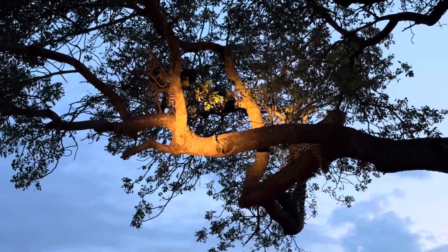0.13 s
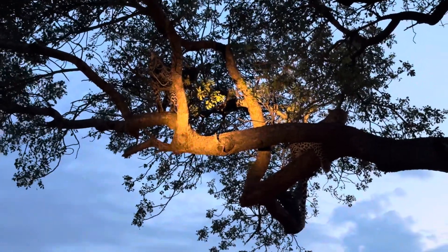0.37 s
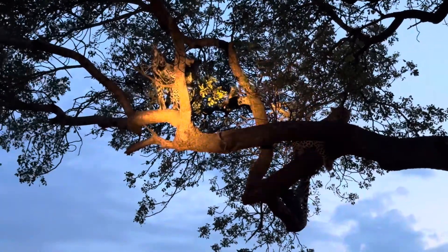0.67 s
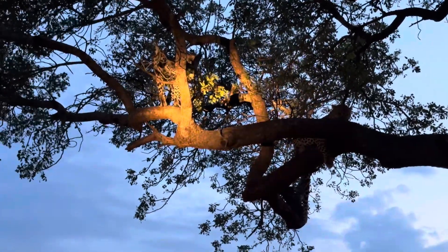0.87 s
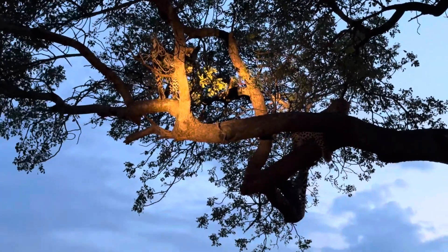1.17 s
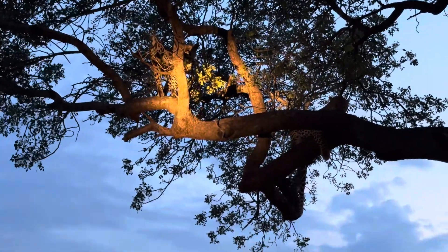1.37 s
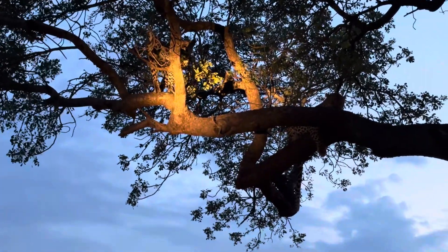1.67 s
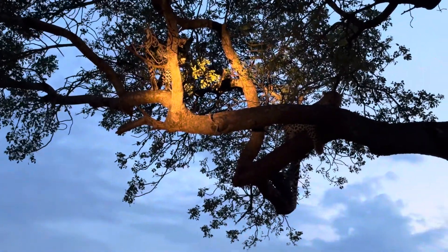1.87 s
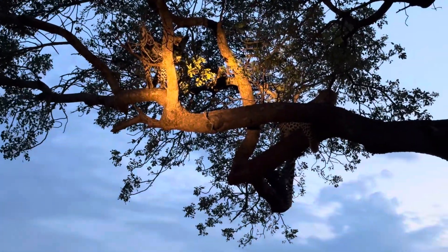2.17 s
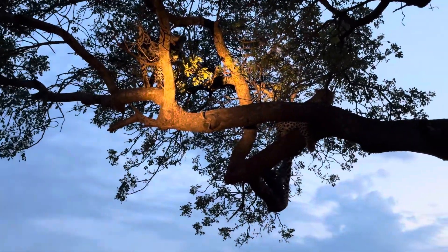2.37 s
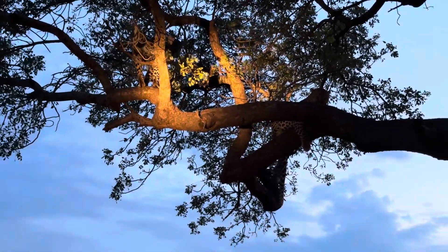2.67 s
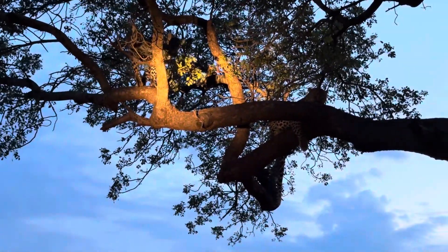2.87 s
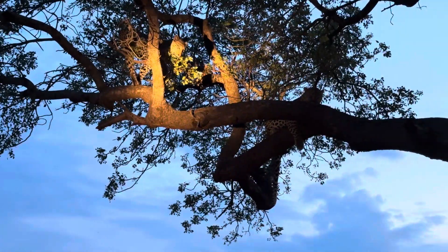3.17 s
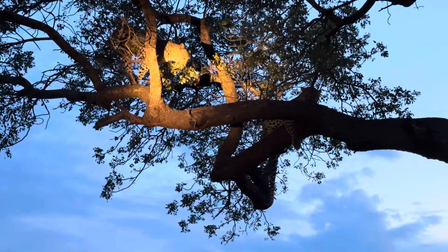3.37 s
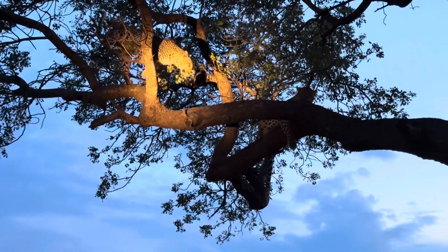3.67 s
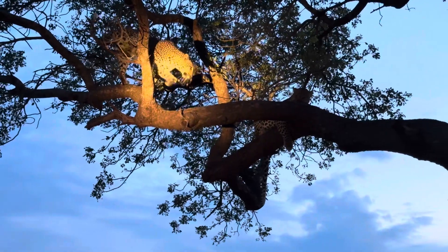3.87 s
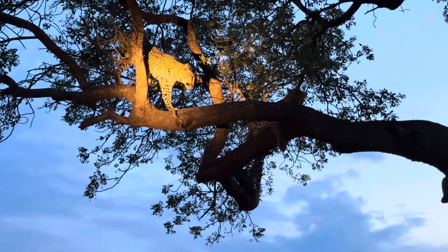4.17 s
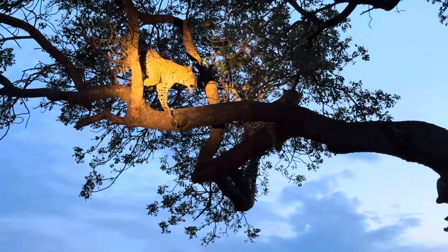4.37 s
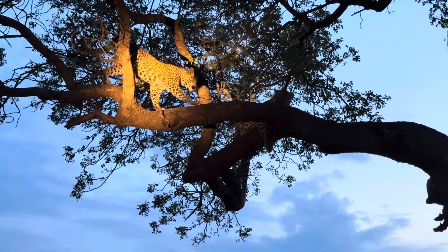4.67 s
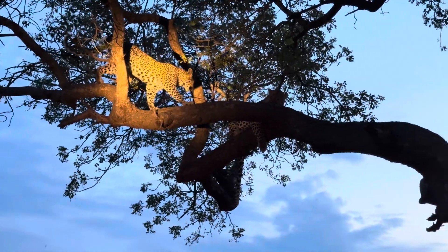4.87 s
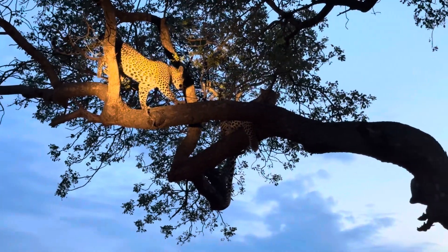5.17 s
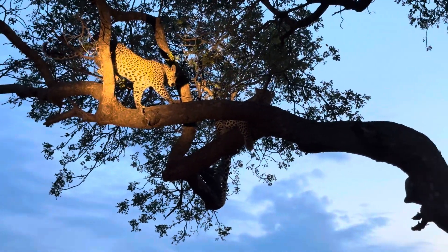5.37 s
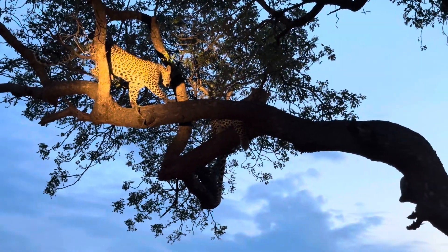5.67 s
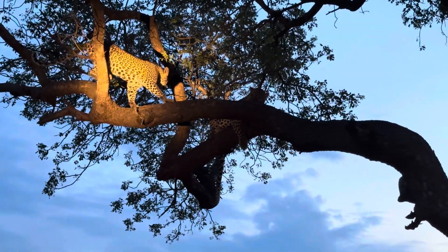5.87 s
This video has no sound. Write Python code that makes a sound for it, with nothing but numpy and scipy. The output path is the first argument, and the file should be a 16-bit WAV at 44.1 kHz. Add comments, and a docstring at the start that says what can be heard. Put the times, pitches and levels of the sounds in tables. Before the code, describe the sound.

Faint insects, soft air and a low rumble continue throughout, outdoors beneath a tree. In the first second a leopard gives two soft, dull, closed-mouth growls. Soft bumps knock the microphone, strongest around 1 second, with a few more up to 3 seconds. Short high trills and very faint distant bird calls come and go until about 5 seconds. Dull rustles follow the first growls. From about 3 seconds leaves crackle lightly and twigs snap as the cat climbs down, with sharper cracks at 3.2 and 4.5 seconds. From 3.6 seconds a low rattling growl swells, is fullest between 4.4 and 4.8 seconds, and fades by 5.2. At 5.4 seconds a louder cough opens a quick run of about six hollow grunts. At 5.9 seconds a short rasping snarl ends it.

```python
"""Leopards in a tree at dusk, heard from below. Insects, faint air and low rumble run throughout.
First: soft closed-mouth growls, far birds, high trills and soft bumps at the microphone.
Twigs snap and leaves crackle as one cat climbs down.
From 3.55 s a rattling growl swells, each beat ringing throat and chest.
At 5.36 s a cough opens a run of hollow grunts; at 5.9 s a rasping snarl ends it."""
import sys
import numpy as np
from scipy import signal
from scipy.fft import rfft, irfft, next_fast_len
from scipy.io import wavfile

SR = 44100
rng = np.random.default_rng(int(sys.argv[2]) if len(sys.argv) > 2 else 0)


def wav_record(signal):
    """Record a signal, one row per channel, as 16-bit PCM in the file named by sys.argv[1]."""
    frames = np.transpose(np.atleast_2d(signal))
    bounded = np.clip(frames, -1, 1)
    # unit amplitude maps onto the largest positive 16-bit level
    quanta = np.round(bounded * 32767).astype(np.int16)
    wavfile.write(sys.argv[1], SR, quanta)


N = 265482
TIME_S = np.arange(N) / SR
RING_N = SR // 4
RING_S = np.arange(RING_N) / SR


def amp(db):
    """Decibels to gain."""
    return 10 ** (np.asarray(db) / 20)


def unit(x):
    """Scale to rms 1."""
    return x / np.sqrt(np.mean(x ** 2) + 1e-30)


def peaked(x):
    """Scale to peak 1."""
    return x / (abs(x).max() + 1e-30)


def at_time(curve, s):
    """Interpolate (time [s], value) rows."""
    return np.interp(s, *np.transpose(curve))


def at_hz(curve, hz):
    """Interpolate (frequency [Hz], value) rows on a log axis."""
    knots_hz, value = np.transpose(curve)
    return np.interp(np.log(hz + 1), np.log(knots_hz + 1), value)


def add(mix, s, sound):
    """Mix a sound in at time s."""
    part = mix[max(round(s * SR), 0):][:len(sound)]
    part += sound[:len(part)]


def noise(gain, size=N):
    """Noise of rms 1 shaped by gain(Hz)."""
    padded = next_fast_len(size, True)
    spectrum = rfft(rng.standard_normal(padded)) * gain(np.fft.rfftfreq(padded, 1 / SR))
    return unit(irfft(spectrum, padded)[:size])


def hiss(spectrum, size=N):
    """Noise of rms 1 shaped by (frequency [Hz], level [dB]) rows."""
    return noise(lambda f: amp(at_hz(spectrum, f)), size)


def band(hz, width_hz, size=N):
    """Gaussian noise band; at 0 Hz, a random drift."""
    return noise(lambda f: np.exp(-((f - hz) / width_hz) ** 2 / 2), size)


def swells(rows, attack_s, release_s):
    """Gain from (start [s], hold [s], level [dB]) rows; attack and release per 20 dB."""
    each_db = [db - 20 * (np.maximum(s - TIME_S, 0) / attack_s
                          + np.maximum(TIME_S - s - hold_s, 0) / release_s) for s, hold_s, db in rows]
    return amp(np.max(each_db, axis=0))


def ring(modes, rise_s, rough, detune, soft=1):
    """One beat rings noisy, detuned modes (frequency [Hz], level [dB], t60 [s]); peak 1."""
    out = np.zeros(RING_N)
    for hz, db, t60_s in modes:
        tone = np.sin(2 * np.pi * hz * (1 + detune * rng.uniform(-1.48, 1)) * RING_S)
        out += amp(db - 60 * RING_S / t60_s) * (tone + rough * band(hz, hz / 7, RING_N))
    return peaked(out * (1 - np.exp(-RING_S / rise_s)) ** soft)


def air(air_db=-75, lump_db=2.5):
    """Faint evening air and lumpy rumble, partly different at the two microphone ports."""
    # spectra: (frequency [Hz], relative level [dB])
    air_spectrum = [(20, -22.5), (150, -0.5), (700, -15.5), (2200, -25), (3400, -23), (6000, -28),
                    (9500, -19.5), (12000, -36), (16000, -31)]
    rumble_spectrum = [(15, -26), (59, -2.5), (93, -11), (124, -28), (300, -39), (390, -34.5), (660, -120)]
    # rumble envelope: (time [s], level [dB])
    rumble_db = [(0, -62), (.45, -52), (1.3, -58), (2.3, -61.5), (3.6, -55), (4.55, -52), (5.25, -60.5),
                 (5.9, -72)]
    sides = np.array([[1], [-1]])
    gain = amp(at_time(rumble_db, TIME_S)) * unit(amp(lump_db * band(0, 8)))
    rumble = gain * (hiss(rumble_spectrum) + 0.92 * sides * hiss(rumble_spectrum))
    low_air = 0.39 * sides * band(0, 710)
    return rumble + amp(air_db) * (hiss(air_spectrum) + low_air)


def insects(flutter_db=3.5):
    """Many distant insects merge into fluttering bands."""
    # chorus bands: (centre [Hz], width [Hz], level [dB])
    bands = [(4216, 360, -81), (7580, 180, -82.5), (7940, 84, -76.5), (9660, 58, -88.5),
             (10230, 290, -90.5)]
    return sum(amp(db) * unit(band(hz, width_hz) * amp(flutter_db * band(0, 6.3)))
               for hz, width_hz, db in bands)


def low_growl(chest_hz=140, beats_per_s=19):
    """Mouth shut: only a dull throb of uneven chest beats comes out."""
    # soft growls: (start [s], hold [s], level [dB])
    growls = [(0, 0.16, -59), (.3, 0.73, -62.5)]
    beats = np.cumsum(beats_per_s * (1 + 0.23 * band(0, 5.7))) / SR
    throb = unit(band(chest_hz, 30) * amp(3.3 * np.cos(2 * np.pi * beats)))
    return swells(growls, attack_s=0.17, release_s=0.38) * throb


def far_birds(notes_per_s=15, arch_hz=260, waver_hz=120):
    """Soft wavering whistles arch up and down in pitch."""
    # phrases: (start [s], length [s], level [dB], top pitch [Hz])
    phrases = [(0, 0.042, -78, 2780), (0.192, 0.23, -80.5, 2970), (1.676, 0.055, -81, 2560),
               (3.74, 0.13, -74, 1823)]
    out = np.zeros(N)
    for s, length_s, db, hz in phrases:
        t = np.arange(0, length_s, 1 / SR)
        arch = np.sin(np.pi * t / length_s)
        pitch_hz = hz + arch_hz * (arch - 1) + waver_hz * band(0, 37, len(t))
        notes = np.sin(np.pi * t * notes_per_s) ** 2
        add(out, s, amp(db) * arch ** .5 * notes * np.sin(2 * np.pi * np.cumsum(pitch_hz) / SR))
    return out


def trills(notes_per_s=56.5, climb_hz=480):
    """Runs of tiny falling whistles; each run climbs in level and pitch, holds, stops."""
    # runs: (start [s], length [s], level [dB], nominal pitch [Hz])
    runs = [(0.028, 0.25, -55.5, 5174), (0.392, 0.22, -59.5, 4950), (1.875, 0.23, -60, 4984),
            (2.124, 0.23, -54, 5160), (2.807, 0.19, -64, 5000), (2.969, 0.16, -64.5, 5140),
            (3.952, 0.23, -59, 4980), (5.004, 0.19, -63, 5000)]
    out = np.zeros(N)
    for s, length_s, db, hz in runs:
        t = np.arange(0, length_s, 1 / SR)
        note_phase = np.cumsum(notes_per_s * (1 + .09 * band(0, 20, len(t)))) / SR % 1
        climb = np.minimum(2 * t / length_s, 1)
        pitch_hz = hz + 200 - climb_hz * (1 - climb) ** 2 - 800 * note_phase * (1 + note_phase)
        notes = np.exp(-((note_phase - .25) / 0.21) ** 2 / 2) * np.sin(np.pi * note_phase) ** .5
        swell = np.sin(np.pi * t / length_s) ** 0.25 * climb ** 0.69
        add(out, s, amp(db) * swell * notes * np.sin(2 * np.pi * np.cumsum(pitch_hz) / SR))
    return out


def bumps(port_lead_rad=0.47):
    """Soft knocks and plops at the microphone sink in pitch; one port leads the other."""
    # (peak time [s], level [dB], pitch [Hz], half length [s], fall [octaves per half length])
    knocks = [(0.061, -50.5, 500, 0.0018, 0.18), (0.531, -41, 56.5, 0.013, 0.09),
              (0.724, -37.5, 77, 0.013, 0.053), (0.769, -38.5, 294, 0.0028, 0.72),
              (0.784, -37, 542, 0.0018, 0.56), (0.966, -28.5, 77.5, 0.0117, 0.27),
              (1.008, -34.5, 64, 0.013, 0.14), (1.872, -34.5, 73.4, 0.01224, 0.85),
              (2.416, -42.5, 67.3, 0.013, 0.07), (2.996, -40.5, 72.5, 0.01, 0.16),
              (3.61, -58.5, 467, 0.003, 0.18)]
    out = np.zeros((2, N))
    for s, db, hz, half_s, fall in knocks:
        halves = np.arange(-2 * half_s, 4 * half_s, 1 / SR) / half_s
        cycles = np.cumsum(hz * 2 ** (-fall * np.clip(halves, -2, 2))) / SR + rng.random()
        swell = np.exp(-halves ** 2 / np.where(halves < 0, 1, 2))
        swell *= signal.windows.tukey(len(halves), .15)
        for port, lead_rad in zip(out, (port_lead_rad, 0)):
            add(port, s - 2 * half_s, amp(db) * swell * np.sin(2 * np.pi * cycles + lead_rad))
    return out


def snaps():
    """A twig breaks: crack, bright splinter, crumbling tail; the branch knocks."""
    # (time [s], relative crack level [dB], splinter over wood [dB], knock level [dB])
    breaks = [(0.786, -78, 21, -66), (1.673, -57, -27, -63.5), (3.219, -43.5, 1.5, -67),
              (3.224, -44.5, 1.5, -57), (3.294, -66.5, 16.5, -81), (3.962, -62.5, 10, -86),
              (4.495, -40, -25, -52.5), (4.542, -60.5, 14, -54), (4.557, -42, 4, -39)]
    # crack spectra: (frequency [Hz], relative level [dB])
    wood = [(150, -16), (350, 7.5), (800, -6), (3000, -8.5), (5000, -36), (16000, -45)]
    splinter = [(1000, -31), (3500, 2.5), (7000, 9), (16000, -3)]
    # branch modes: (frequency [Hz], relative level [dB], t60 [s])
    branch = [(1028, 4.4, 0.036), (1236, 12.6, 0.022), (1457, 7.3, 0.041)]
    out = np.zeros(N)
    for s, db, bright_db, knock_db in breaks:
        crack = hiss(wood, RING_N) + amp(bright_db) * hiss(splinter, RING_N)
        crumble = peaked(amp(3.9 * band(0, 280, RING_N)))
        decay = np.exp(-RING_S / 0.0019) + amp(-0.5) * crumble * np.exp(-RING_S / 0.027)
        add(out, s, amp(db - 7) * crack * decay)
        add(out, s, amp(knock_db) * ring(branch, rise_s=.0005, rough=.35, detune=.02))
    return out


def shudder():
    """A dull shudder dies away after a double plop."""
    # (start [s], hold [s], level [dB])
    burst = [(0.79, 0.017, -55.5)]
    return swells(burst, attack_s=0.014, release_s=0.19) * band(120, 225)


def rustles(stir_db=-81, crackle_db=4, clump_db=2):
    """Dull nearby rustles over a faint stir; leaves brushed by the cat crackle in clumps."""
    # events: (start [s], hold [s], level [dB])
    nearby = [(1.0, 0.05, -63.5), (1.14, 0.095, -66.5), (1.33, 0.065, -63.5)]
    brushes = [(3.09, 0.4, -74.5), (3.64, 0.038, -77), (3.95, 0.44, -82.5), (4.54, 0.03, -71.5),
               (5.37, 0.38, -78.5)]
    # spectra: (frequency [Hz], relative level [dB])
    dull_spectrum = [(88, -16.5), (150, -4.5), (900, -21.5), (1350, -20), (1650, -23.5), (3090, -36),
                     (8410, -35.5), (15000, -56)]
    leaf_spectrum = [(300, -10), (2500, -0.5), (10000, 2), (12000, -9.5)]
    dull_gain = np.hypot(swells(nearby, attack_s=0.17, release_s=0.1), amp(stir_db))
    dull = dull_gain * unit(hiss(dull_spectrum) * amp(2 * band(0, 8)))
    crackle = amp(crackle_db * band(0, 250) + clump_db * band(0, 6.2))
    return dull + swells(brushes, attack_s=0.2, release_s=0.35) * unit(hiss(leaf_spectrum) * crackle)


def chirps(hz=4140, width_hz=110, length_s=0.16):
    """Far calls, smeared by distance into short narrow-band swells."""
    # (peak time [s], level [dB])
    calls = [(1.799, -77.5), (4.4, -76)]
    out, size = np.zeros(N), round(length_s * SR)
    for s, db in calls:
        add(out, s - length_s / 2, amp(db) * signal.windows.hann(size) * band(hz, width_hz, size))
    return out


def growl(start_s=3.55, end_s=5.2, jitter_s=.0016, chest_lag_s=0.00373, rasp_db_per_s=8.5):
    """About 20 beats/s: rasp and throat ring, let out by the open mouth, then the chest booms."""
    # modes: (frequency [Hz], relative level [dB], t60 [s])
    throat_modes = [(384, 1, 0.083), (536, 2, 0.063), (760, 5.5, 0.067), (1194, -9.5, 0.059),
                    (1534, -13, 0.18)]
    rasp_modes = [(2420, -6, 0.052), (2740, -7.5, 0.14), (3880, 0, 0.043), (4770, -8, 0.042)]
    chest_modes = [(180, 0, .06), (126, -9, .065), (335, -22, .06)]
    # effort, a small swell then a long one: (time [s], relative level [dB])
    effort_db = [(3.65, -56), (3.76, -49), (4.01, -43), (4.14, -49.5), (4.26, -43.5), (4.47, -40),
                 (4.8, -42.5), (4.93, -46.5), (5.02, -43), (5.18, -48.5)]
    # let out by the mouth: (time [s], level [dB])
    mouth_db = [(4.17, -77), (4.275, -59.5), (4.37, -56.5), (4.42, -63), (4.465, -49.5), (4.52, -57.5),
                (4.605, -55.5), (4.655, -61.5), (4.745, -52.5), (4.8, -46.5), (4.853, -57), (4.92, -63.5),
                (5.02, -59.5), (5.18, -69.5)]
    # quicker as the cat pushes hardest: (time [s], rate [beats/s])
    pace = [(3.6, 20.3), (3.8, 18.6), (4.17, 19.3), (4.23, 21.15), (4.72, 21.05), (4.8, 18.7)]
    # throat modes rise as the jaw drops: (time [s], frequency ratio)
    tuning = [(4.45, .97), (4.78, 1.08)]
    out, s = np.zeros(N), start_s
    while s < end_s:
        push = rng.standard_normal()
        beat_s = s + jitter_s * rng.standard_normal()
        chest_db = at_time(effort_db, s) + 2.5 + 1.1 * push
        throat_db = at_time(mouth_db, s) + 1.5 * push
        rasp_db = throat_db - 15 + rasp_db_per_s * (s - start_s)
        chest = ring(chest_modes, rise_s=0.012, rough=0.2, detune=0.02, soft=1.4)
        tuned_modes = [(hz * at_time(tuning, s), db, t60_s) for hz, db, t60_s in throat_modes]
        add(out, beat_s + chest_lag_s, amp(chest_db) * chest)
        add(out, beat_s, amp(throat_db) * ring(tuned_modes, rise_s=0.003, rough=0.55, detune=0.03))
        add(out, beat_s, amp(rasp_db) * ring(rasp_modes, rise_s=0.001, rough=0.5, detune=0.015))
        s += 1 / at_time(pace, s)
    return out


def gravel(grain_db=6.5):
    """Air tears unevenly through the slack throat, rasping between the growl's beats."""
    # (start [s], hold [s], level [dB])
    breath = [(3.65, 1.5, -74)]
    rough_air = unit(band(430, 162) * amp(grain_db * band(0, 36)))
    return swells(breath, attack_s=0.084, release_s=0.19) * rough_air


def pop():
    """The open mouth rings hollow."""
    # (frequency [Hz], relative level [dB], t60 [s])
    mouth_modes = [(921, 11.5, 0.047), (1644, -14.5, 0.071)]
    return ring(mouth_modes, rise_s=.003, rough=.22, detune=.015, soft=1.5)


def hum():
    """The throat rings on one soft note."""
    return ring([(396, 0, 0.085)], rise_s=0.012, rough=0.2, detune=0.015)


def grunts(cough_s=5.357, pop_lead_s=.039, hum_lead_s=0.017):
    """A cough, then grunts over a rough gargle: each a mouth pop, a throat note, a chest beat."""
    # (time [s], relative chest level [dB], pop level [dB])
    beats = [(5.378, -35, -54), (5.445, -37, -49.5), (5.543, -40, -62), (5.626, -38, -55),
             (5.715, -38.5, -65), (5.798, -44, -65)]
    # (frequency [Hz], relative level [dB], t60 [s])
    chest_modes = [(189, 14.5, 0.025), (366, 2.5, 0.034), (933, -7, 0.019), (1450, -17.5, 0.028)]
    # (centre [Hz], width [Hz], level [dB])
    gargle_bands = [(179, 170, -59), (910, 105, -71.5), (2500, 490, -78.5)]
    out = np.zeros(N)
    add(out, cough_s, amp(-33) * pop() + amp(-34.5) * hum())
    for s, db, pop_db in beats:
        add(out, max(s - pop_lead_s, cough_s), amp(pop_db) * pop())
        add(out, s - hum_lead_s, amp(db - 18) * hum())
        chest = ring(chest_modes, rise_s=0.059, rough=0.55, detune=0.04, soft=2)
        add(out, s - .004, amp(db + 3.5) * chest)
    size = round((beats[-1][0] - cough_s + 0.015) * SR)
    gargle = sum(amp(db) * band(hz, width_hz, size) for hz, width_hz, db in gargle_bands)
    flutter = unit(amp(6.4 * band(0, 23, size)))
    add(out, cough_s, gargle * flutter * signal.windows.tukey(size, .15))
    return out


def snarl(hold_s=.12, rasp_air_db=-62, hiss_db=-68, throat_db=-44):
    """Uneven sharp beats, grainy rasp and a growing hiss through bared teeth over a rumbling throat."""
    # (time [s], relative rasp level [dB], relative chest level [dB])
    beats = [(5.907, -49.5, -51), (5.9171, -53, -34), (5.94, -40, -52), (5.948, -48, -44.5),
             (5.967, -59, -45.5), (5.978, -52, -54), (5.992, -36, -42.5)]
    # (frequency [Hz], relative level [dB], t60 [s])
    rasp_modes = [(1542, -0.5, 0.045), (2270, -7, 0.024), (2696, 5.5, 0.03), (3160, -7, 0.017)]
    chest_modes = [(345, 0, 0.07), (170, -3, 0.04)]
    start_s, third_beat_s = beats[0][0], beats[2][0]
    grain = amp(4 * band(0, 110))
    rasp = unit(grain * sum(amp(db) * band(hz, 130) for hz, db, _ in rasp_modes))
    teeth = unit(grain * band(3400, 3600))
    out = rasp * swells([(start_s + 0.0087, hold_s, rasp_air_db)], attack_s=0.011, release_s=.05)
    out += teeth * swells([(start_s + 0.054, hold_s, hiss_db)], attack_s=0.13, release_s=.05)
    out += band(85, 89) * swells([(third_beat_s, hold_s, throat_db)], attack_s=0.032, release_s=.05)
    for s, rasp_db, chest_db in beats:
        add(out, s, amp(rasp_db - 2.5) * ring(rasp_modes, rise_s=0.0003, rough=0.7, detune=0.04))
        chest = ring(chest_modes, rise_s=0.0015, rough=0.35, detune=0.025)
        add(out, s + 0.0016, amp(chest_db + 2) * chest)
    return out


def outdoors(x, wet_db, t60_s, echoes_per_s=3000):
    """Scattered echoes from branches and ground, mostly alike at both ports."""
    taps = rng.standard_normal((3, RING_N)) * (rng.random((3, RING_N)) < echoes_per_s / SR)
    taps *= amp(-60 * RING_S / t60_s) * (RING_S > .004)
    tail = taps[0] + 0.5 * taps[1:]
    return x + amp(wet_db) * signal.oaconvolve(x[None], tail / np.linalg.norm(tail[0]), axes=1)[:, :N]


def scene():
    """Cats and twigs in the tree, small callers farther off, bumps at the microphone."""
    cats = outdoors(growl() + gravel() + grunts() + snarl() + low_growl(), wet_db=-13, t60_s=.2)
    twigs = outdoors(snaps(), wet_db=-8.5, t60_s=0.089)
    callers = outdoors(trills() + far_birds(), wet_db=-3, t60_s=.24)
    return cats + twigs + callers + bumps() + shudder() + chirps() + insects() + rustles() + air()


def record(dry):
    """The two microphone ports differ in phase, mostly in the treble; low-pass at 15.8 kHz."""
    # (frequency [Hz], phase difference [rad])
    port_phase = [(5000, 0.2), (6750, 0.03), (7900, 2.99), (8600, 3.02), (9200, 1.22), (11000, 0.39),
                  (15000, 1.24)]
    size = next_fast_len(N + 2048, True)
    phase_rad = at_hz(port_phase, np.fft.rfftfreq(size, 1 / SR))
    ports = irfft(rfft(dry, size) * np.exp(1j * phase_rad * np.array([[.5], [-.5]])), size)[:, :N]
    lowpass = signal.firwin(511, 15800, window=("kaiser", 9), fs=SR)
    return signal.oaconvolve(ports, lowpass[None], "same")


dry = scene()
out = record(dry)
wav_record(out)
```